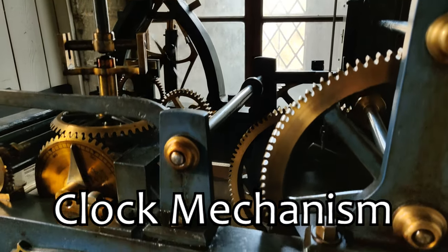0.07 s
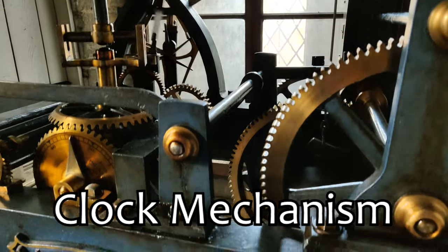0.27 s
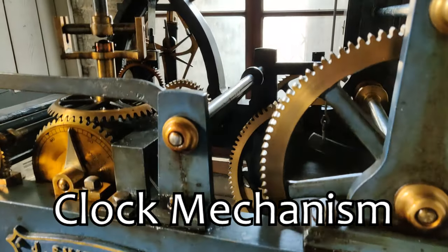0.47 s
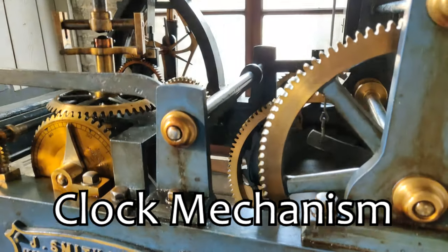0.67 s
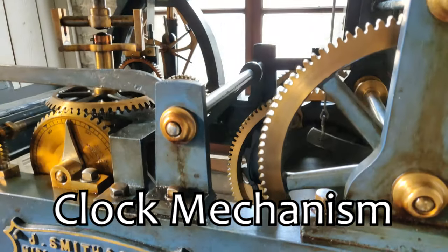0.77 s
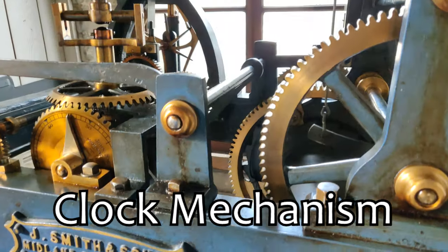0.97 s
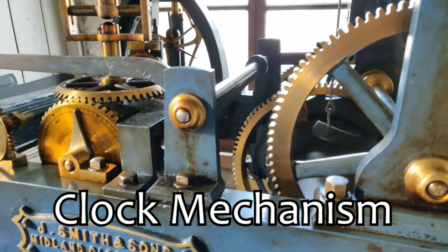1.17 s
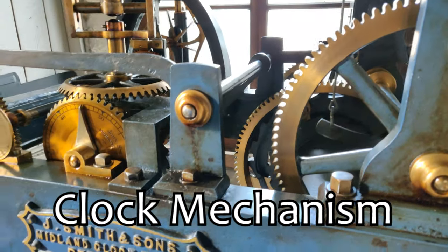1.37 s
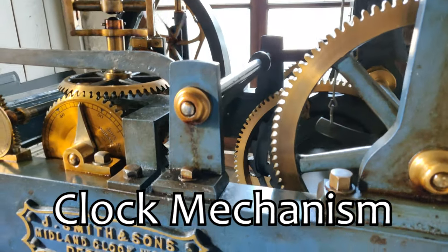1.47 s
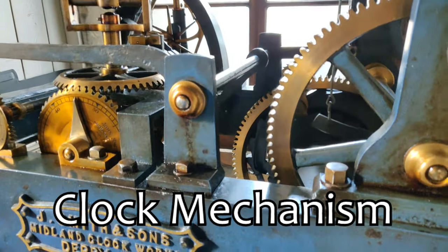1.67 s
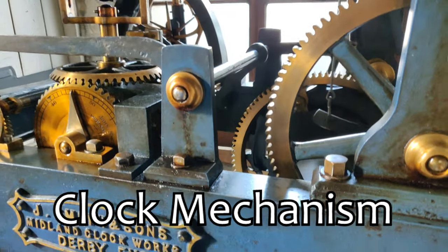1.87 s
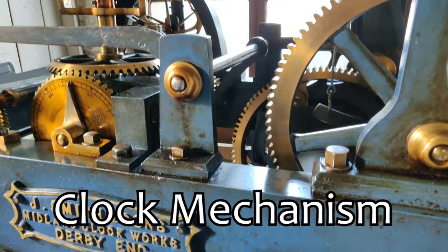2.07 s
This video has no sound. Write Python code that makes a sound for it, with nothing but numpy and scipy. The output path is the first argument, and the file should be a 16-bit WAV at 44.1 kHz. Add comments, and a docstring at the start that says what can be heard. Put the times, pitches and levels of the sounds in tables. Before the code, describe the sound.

A large tower clock mechanism ticks and tocks with heavy metallic clunks in a small room

```python
"""Low rumble and hiss in a small clock room, then two soft knocks: a tower clock in stereo, from close by.
Then come one tick and one tock: each a steel blow and its rebound, ringing iron frame and room.
Between them a small catch pings, and the gear train knocks softly on either side of each beat.
Knocks and blows are shaped noise decaying in frequency bands, metal rings are decaying sines
blurred by reflections, and the room's own sound is steady filtered noise."""
import sys
import numpy as np
from scipy import signal
from scipy.fft import rfft, irfft
from scipy.io import wavfile

SR = 44100
rng = np.random.default_rng(int(sys.argv[2]) if len(sys.argv) > 2 else 0)


def wav_out(sig):
    """Save sig, one row per channel (or a flat mono array), as 16-bit PCM at SR to the path in sys.argv[1]."""
    wavfile.write(sys.argv[1], SR, np.round(np.clip(np.atleast_2d(sig).T, -1, 1) * 32767).astype(np.int16))


N = 92610  # samples, 2.1 s

# Standing sound of the room. Each row: frequency in Hz, relative density in dB per Hz.
ROOM_TONE = [(10, -38), (25, -15), (40, -4), (52, -10.5), (65, -4), (95, -14), (130, -5), (200, -8),
             (400, -7.5), (600, -15), (1000, -19.5), (1500, -27.5), (2300, -28), (4500, -32), (7000, -33),
             (11000, -33.5), (15800, -31.5)]
# Likeness of the two channels in the room tone. Each row: frequency in Hz, likeness from 0 to 1.
ROOM_TONE_LIKENESS = [(40, 0.76), (200, 0.28), (700, 0.095), (4000, 0.1), (7000, 0.94), (15000, 1)]
# Decay of the clock room. Each row: frequency in Hz, t60 in s.
ROOM_DECAY = [(60, 1.0), (160, 0.87), (300, 0.83), (600, 0.7), (1100, 0.54), (2200, 0.51), (4000, .32),
              (7000, 0.28), (11000, 0.22), (15500, 0.18)]
# Build-up of sound in the room. Each row: frequency in Hz, rise time constant in s.
ROOM_RISE = [(80, .02), (250, 0.012), (600, 0.0073), (1200, 0.004), (4000, 0.0023), (15000, 0.003)]
# Place of the mechanism between the channels. Each row: frequency in Hz, left minus right in dB.
CLOCK_PAN = [(50, 4), (180, 1.5), (400, 6), (900, 1.5), (1500, 3.5), (2500, -1), (4500, 2.5), (6000, 9.5),
             (9000, -3.5), (15000, -5.5)]
# Likeness of the two channels in the mechanism. Each row: frequency in Hz, likeness from 0 to 1.
CLOCK_LIKENESS = [(50, 0.9), (170, 1), (350, 0.9), (700, 0.11), (2500, 0.025), (6000, 0.088), (9000, 0.57),
                  (14000, 0.99)]
# Soft knocks of the gear train. Each row: start in seconds, level before build-up and decay in dB,
# treble tilt in dB per octave, bass lift in dB, share of the room's decay time (ratio).
GEAR_KNOCKS = [(.102, -50, 2, 11.5, 0.83), (.119, -49.5, 0.5, 10, 0.61), (.822, -62.5, 3, 7, 2.5),
               (.839, -57.5, -2.5, -8, 1.13), (1.122, -46.5, -1.5, -17, 0.31), (1.14, -52.5, -1, 3, 1.52),
               (1.207, -60, 2, 2, 3), (1.497, -53, -0.5, -0.5, 0.98), (1.595, -56, 5, -1, 2),
               (1.955, -59, 3, 12, 1.16)]
# Colour of a gear knock. Each row: frequency in Hz, relative density in dB per Hz.
GEAR_COLOUR = [(50, -10), (130, -4), (230, -1), (400, -4.5), (600, -2), (900, -2), (1500, -12.5),
               (2500, -16.5), (4000, -25), (6000, -28), (9000, -48), (16000, -37)]
# Small parts ringing briefly. Each row: start in seconds, frequency in Hz, level in dB, t60 in s.
SMALL_RINGS = [(0.13, 745, -49, .28), (0.11, 240, -44, 0.3), (0.13, 5900, -64.5, 0.11),
               (0.93, 930, -61.5, 0.43), (1.129, 159, -53, 0.72), (1.127, 575, -56.5, 0.82),
               (1.17, 1057, -58.5, 0.54), (1.505, 2420, -60.5, 0.25)]
# Escapement blows, tick then tock. Each row: start in seconds, level before build-up and decay in dB,
# bass lift in dB, rebound delay in s, rebound relative to the blow in dB, rebound bass lift in dB,
# frame ring level in dB, steel ring level in dB.
ESCAPEMENT_BEATS = [(0.2257, -28, -2, .027, -3.5, 2, -44, -47.5),
                    (1.6342, -32.5, -6, .032, 1, 2.5, -45.5, -51)]
# Colour of the tick's blow. Each row: frequency in Hz, relative density in dB per Hz.
TICK_COLOUR = [(29, -53), (50, -17), (239, -3.5), (304, -6), (406, -4.5), (707, -8.5), (922, -7.5),
               (1140, -12), (1230, -14), (1640, -21), (2300, -21.5), (2720, -24), (3820, -28),
               (4520, -18.5), (5090, -25.5), (5890, -18), (6330, -19), (6970, -23.5), (11000, -29.5),
               (14700, -13.5), (15800, -20)]
# Colour of the tock's blow. Each row: frequency in Hz, relative density in dB per Hz.
TOCK_COLOUR = [(29, -69), (50, -27), (148, -11), (319, -9), (369, -1), (416, -18), (458, 1.5), (530, -20),
               (779, -12.5), (1040, -18), (1170, -15.5), (1640, -25.5), (2300, -25), (2930, -27),
               (3820, -24), (6800, -23.5), (8650, -41), (10200, -26.5), (13300, -40), (14700, -23.5),
               (15800, -30)]
# Iron frame modes. Each row: frequency in Hz, t60 in s, dB in the tick, dB in the tock,
# both relative to the beat's frame ring level.
FRAME_MODES = [(160.5, 1.4, -1, -6), (184.5, 1.9, -20, -9), (209.2, 0.96, -2.5, -1),
               (247.6, 0.56, 5.5, 2.5), (385.6, 0.61, 0, 1.5), (406.6, 0.62, 5.5, -23),
               (458, 0.88, -5, -1.5), (544.5, 0.85, -2, -4.5), (567.5, 0.95, -11, -6),
               (815.4, 0.31, -2, 4.5), (913, 0.51, 5.5, -3), (1131, 0.7, -0.5, 1.5), (1179, 0.67, -11, -9),
               (1220, 0.4, -30, 3.5)]
# Modes of the steel escapement parts. Each row: frequency in Hz, t60 in s, dB in the tick, dB in the tock,
# both relative to the beat's steel ring level.
STEEL_MODES = [(2215, 0.56, -17, -8), (2413, 0.34, -5, -2.5), (3709, 0.1, -8, 6), (4550, 0.14, 0, -11),
               (5870, .22, 0.5, -1), (6365, 0.13, 1, 6.5), (6820, .17, 4, 3.5), (9850, 0.098, -6, 6),
               (12300, 0.21, -4, -1.5), (13902, .16, 0, -10), (15200, 0.097, 3, 6), (15400, 0.14, 10, 7),
               (15354, 0.12, 11, -1)]
# Colour of the catch's fall. Each row: frequency in Hz, relative density in dB per Hz.
CATCH_COLOUR = [(880, -56), (1500, -19.5), (2630, -23.5), (3430, -23), (3710, -30), (4800, -19), (5780, -5),
                (7260, -17), (9010, -27), (9850, -22), (13600, -24), (14700, -22), (15800, -11.5)]
# Ringing of the catch. Each row: frequency in Hz, t60 in s, level relative to CATCH_RING_DB in dB.
CATCH_PINGS = [(5560, 0.24, -4), (5690, 0.22, -5.5), (5850, 0.37, -5), (6020, 0.31, -3.5), (6255, 0.13, -8),
               (6550, 0.16, -14), (15130, .12, -4), (15640, 0.12, -10)]

AIR_DB, HUM_HZ, HUM_DB = -60, 38, -67.5  # levels are rms
EARLY, EARLY_S = 0.25, 0.019  # extra strength (ratio) and decay constant of the first reflections
RATTLE, RATTLE_S = 0.33, 0.003  # depth (natural log) and grain of the chatter in a blow
RIPPLE_DB, RIPPLE_HZ = 3.5, 104  # treble unevenness and spacing of the many small metal resonances
CATCH_S, CATCH_DB, CATCH_RING_DB = 1.1008, -41.5, -48.5
CATCH_DAMPING = 0.85  # share of the room's decay time
EDGE_HZ = 15850  # upper band limit of the recorder


def amp(db):
    """Decibels to gain."""
    return 10 ** (np.asarray(db) / 20)


def evened(x):
    """Scales to an rms of one."""
    return x / np.sqrt(np.mean(x ** 2) + 1e-20)


def read(points, hz):
    """Reads a table on a log-frequency axis."""
    f, value = np.transpose(points)
    f = np.maximum.accumulate(f)
    return np.interp(np.log(hz + 1), np.log(f + 1), value)


def add(mix, s, sound):
    """Mixes a stereo sound in at time s, cut off at the end of the mix."""
    start = max(round(s * SR), 0)
    part = mix[:, start:][:, :sound.shape[1]]
    part += sound[:, :part.shape[1]]


def wobble(size, width):
    """A smooth random curve of rms one, its bumps about width samples wide."""
    smoothing = np.exp(-(np.fft.rfftfreq(size) * width * 2) ** 2)
    return evened(irfft(rfft(rng.standard_normal(size)) * smoothing, size))


def sides(hz):
    """Left and right gains of the mechanism at each frequency, with a mean power of one."""
    gains = amp(np.outer([0.5, -0.5], read(CLOCK_PAN, hz)))
    return gains / np.sqrt((gains ** 2).mean(0))


def noise_pair(likeness, hz):
    """Two partly alike random-phase spectra: the more alike the channels, the narrower the image."""
    a, b = np.exp(2j * np.pi * rng.random((2, len(hz))))
    turn = np.arccos(np.clip(read(likeness, hz), -1, 1)) / 2
    shared, apart = a * np.cos(turn), b * np.sin(turn)
    return np.array([shared + apart, shared - apart])


def decay(t, t60):
    """Exponential decay that falls 60 dB in t60 seconds."""
    return np.exp(-np.log(1000) * t / t60)


def clunk(colour, tilt_db=0, bass_db=0, damping=1, size=65536, count=14):
    """One blow's dense, chattering ring in ironwork and room: the treble rises and dies first."""
    t, hz = np.arange(size) / SR, np.fft.rfftfreq(size, 1 / SR)
    shade = tilt_db * np.log2((hz + 1) / 800)
    shade += bass_db / (1 + (hz / 350) ** 4)
    # hz[1] is the bin width; the ripple deepens towards the treble
    shade += RIPPLE_DB * wobble(len(hz), RIPPLE_HZ / hz[1]) * hz / (hz + 1000)
    coloured = noise_pair(CLOCK_LIKENESS, hz) * sides(hz) * amp(read(colour, hz) + shade)
    spectrum = rfft(evened(irfft(coloured)))
    chatter = np.exp(RATTLE * wobble(size, RATTLE_S * SR) * np.exp(-t / 0.02))

    # overlapping triangular bands, each with its own rise and decay
    centres = np.geomspace(70, 15000, count)
    out = np.zeros((2, size))
    for f, pick in zip(centres, np.eye(count)):
        band = irfft(spectrum * np.interp(hz, centres, pick))
        band = band * chatter ** (f / (f + 1000))  # chatter is strongest in the treble
        rise = 1 - np.exp(-t / read(ROOM_RISE, f))
        out += band * rise * decay(t, read(ROOM_DECAY, f) * damping)
    return out * (1 + EARLY * np.exp(-t / EARLY_S))


def ring(hz, t60, db, blur=0.31, blur_hz=22, size=65536):
    """One decaying mode, made uneven by its reflections."""
    t, f = np.arange(size) / SR, np.fft.fftfreq(size, 1 / SR)
    # reflections as a slow random drift of level and phase, up to about blur_hz
    random_phase = np.exp(2j * np.pi * rng.random((2, size)))
    echoes = np.fft.ifft(random_phase / (1 + (f / blur_hz) ** 4))
    echoes /= np.sqrt(np.mean(abs(echoes) ** 2))
    # the less alike the channels, the further apart their phases
    apart = np.arccos(np.clip(read(CLOCK_LIKENESS, hz), -1, 1)) * np.array([[0.5], [-0.5]])
    apart = apart * rng.choice([-1, 1])
    carrier = np.exp(2j * np.pi * (hz * t + rng.random()))
    wave = ((np.exp(1j * apart) + blur * echoes) * carrier).real
    rise = 1 - np.exp(-t / read(ROOM_RISE, hz))
    return np.sqrt(2) * amp(db) * sides(hz) * wave * rise * decay(t, t60)


def background():
    """Steady room noise and hiss, with a narrow band of noise as a low, wavering hum."""
    hz = np.fft.rfftfreq(N, 1 / SR)
    air = evened(irfft(noise_pair(ROOM_TONE_LIKENESS, hz) * amp(read(ROOM_TONE, hz)), N))
    hum_band = 1 / (1 + ((hz - HUM_HZ) / 3) ** 2)
    hum = evened(irfft(noise_pair(ROOM_TONE_LIKENESS, hz) * hum_band, N))
    return amp(AIR_DB) * air + amp(HUM_DB) * hum


def gear_train():
    """Wheels and levers take up their slack with soft knocks, and small parts ring briefly."""
    out = np.zeros((2, N))
    for s, db, tilt_db, bass_db, damping in GEAR_KNOCKS:
        add(out, s, amp(db) * clunk(GEAR_COLOUR, tilt_db, bass_db, damping))
    for s, hz, db, t60 in SMALL_RINGS:
        add(out, s, ring(hz, t60, db, blur=0.79, blur_hz=0.05 * hz))
    return out


def escapement():
    """Each beat is a blow and a rebound: the blow rings the frame, and both ring the steel."""
    out = np.zeros((2, N))
    colours = (TICK_COLOUR, TOCK_COLOUR)
    for k, (beat, colour) in enumerate(zip(ESCAPEMENT_BEATS, colours)):
        s, db, bass_db, after, rebound_db, rebound_bass_db, frame_db, steel_db = beat
        blow = clunk(colour, tilt_db=0.9, bass_db=bass_db)
        add(out, s, amp(db) * blow)
        rebound = clunk(colour, tilt_db=0, bass_db=rebound_bass_db, damping=0.99)
        add(out, s + after, amp(db + rebound_db) * rebound)
        for hz, t60, *strength in FRAME_MODES:
            add(out, s, ring(hz, t60, frame_db + strength[k], blur=0.61, blur_hz=15))
        for hz, t60, *strength in STEEL_MODES:
            mode_db = steel_db + strength[k]
            add(out, s, ring(hz, t60, mode_db, blur=1.2, blur_hz=70))
            add(out, s + after, ring(hz, t60, mode_db + rebound_db, blur=1.2, blur_hz=70))
    return out


def catch():
    """A light catch falls: a short blow and a cluster of high modes make a bright ping."""
    out = np.zeros((2, N))
    add(out, CATCH_S, amp(CATCH_DB) * clunk(CATCH_COLOUR, damping=CATCH_DAMPING))
    for hz, t60, db in CATCH_PINGS:
        add(out, CATCH_S, ring(hz, t60, CATCH_RING_DB + db, blur=1.1, blur_hz=70.6))
    return out


def scene():
    """The clock in its room."""
    return background() + gear_train() + escapement() + catch()


def record(dry):
    """The recorder's band limit: a steep low-pass filter."""
    low_pass = signal.firwin(511, EDGE_HZ, window=("kaiser", 9), fs=SR)
    return signal.oaconvolve(dry, low_pass[None], "same")


dry = scene()
out = record(dry)
wav_out(out)
```